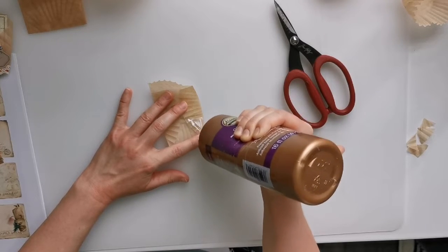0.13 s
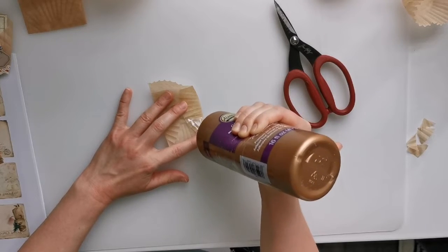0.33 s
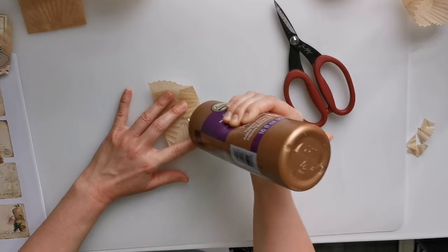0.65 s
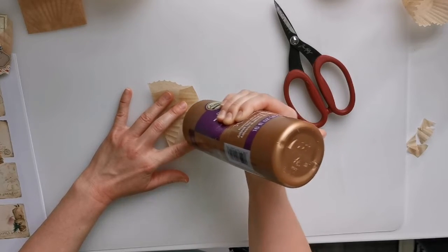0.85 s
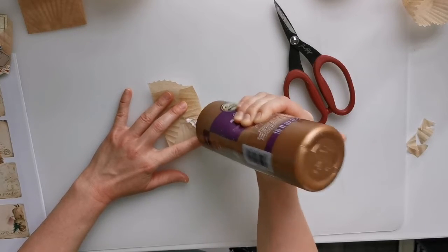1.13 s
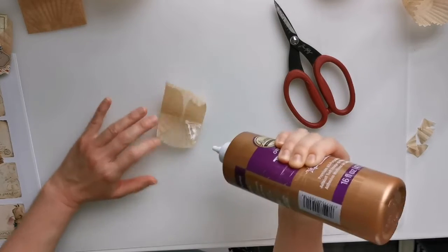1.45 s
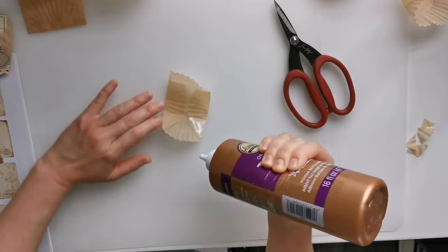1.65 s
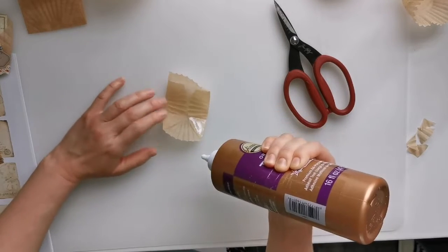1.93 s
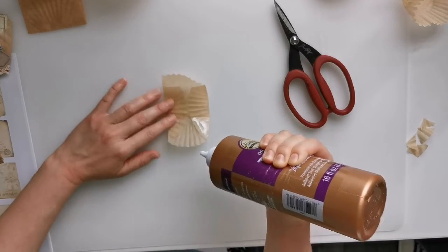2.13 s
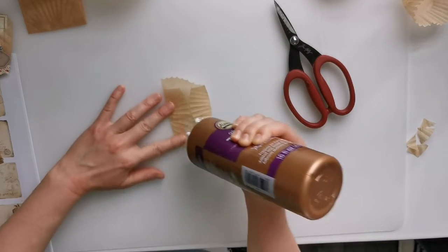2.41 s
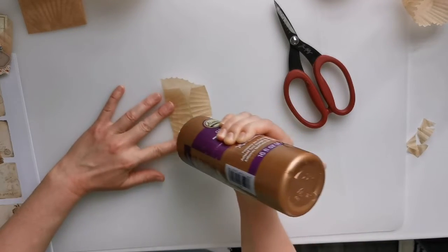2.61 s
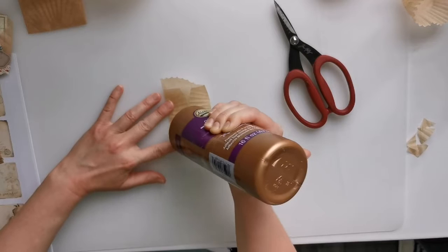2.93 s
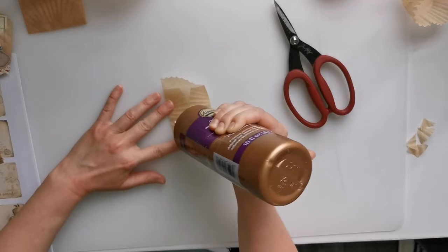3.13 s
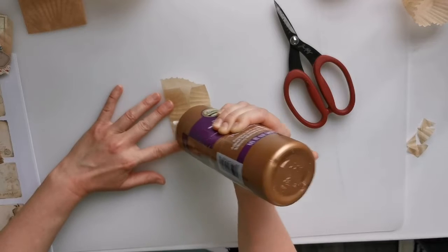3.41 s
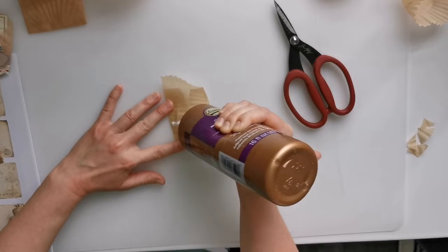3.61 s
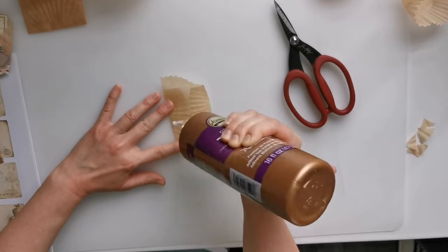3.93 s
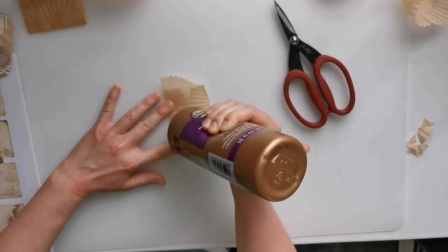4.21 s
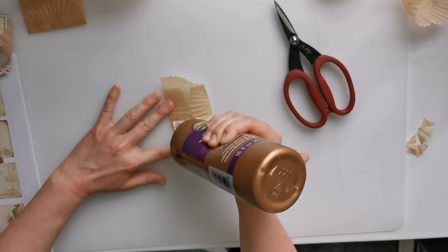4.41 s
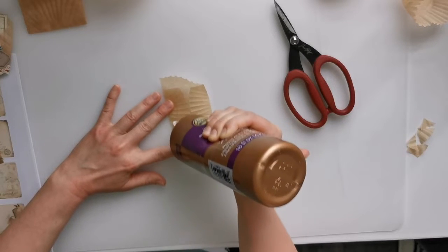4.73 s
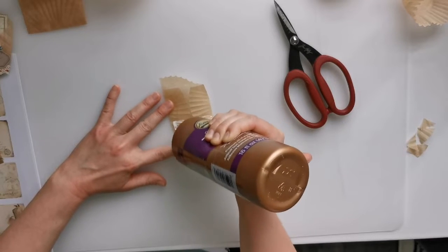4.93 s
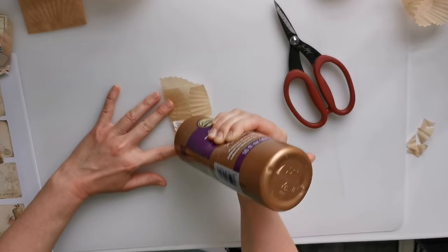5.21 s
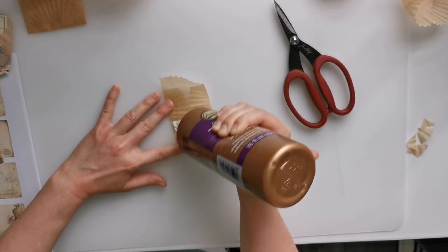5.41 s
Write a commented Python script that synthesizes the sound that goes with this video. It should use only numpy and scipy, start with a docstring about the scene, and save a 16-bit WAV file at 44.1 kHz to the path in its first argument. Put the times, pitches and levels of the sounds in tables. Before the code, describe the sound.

Over a soft fan hum, pleated baking paper ticks, springs loose with sharp snaps, then crinkles under a plastic bottle's tip.

```python
"""A fan hums in a small room while fingers hold pleated parchment paper flat, with faint ticks.
Near 1.4 s the paper springs free with loud snaps and dull scuffs on the table mat; near 2.2 s the
fingers take hold again. From 3 s the nozzle of a plastic glue bottle drags along the pleats: creases
snap in irregular bursts, and strokes rustle and crackle. Last dabs follow from about 4.5 s.
Now and then a hand bumps the table; the table and the room throw each snap back."""
import sys
import numpy as np
from scipy import signal
from scipy.fft import rfft, irfft, next_fast_len
from scipy.io import wavfile
from scipy.ndimage import map_coordinates

SR = 44100
rng = np.random.default_rng(int(sys.argv[2]) if len(sys.argv) > 2 else 0)


def unload_audio(sound):
    """Save the sound as a 16-bit wav file, at the path given as the first command line argument."""
    columns = np.transpose(np.atleast_2d(sound))
    # keep every value between -1 and 1, then stretch to whole-number steps
    steps = np.round(np.clip(columns, -1, 1) * 32767)
    wavfile.write(sys.argv[1], SR, steps.astype(np.int16))


N = 245195

# strokes over the paper; fingers slide smoothly, the nozzle catches on the pleats:
# start_s, length_s, level_db, crackle_over_rub_db
STROKES = [(1.372, 0.03, -43.5, -3), (1.408, .06, -62, -4), (1.461, 0.069, -52.5, -11),
           (1.703, 0.061, -58.5, -2), (1.766, 0.043, -56.5, -4.5), (2.171, 0.093, -50, -6),
           (2.307, .15, -54, -3.5), (2.45, .11, -60.5, -3.5), (2.598, 0.099, -72, -5),
           (3.047, 0.053, -67, 6), (3.2, 0.22, -64.5, 12), (3.55, .14, -58, 11), (3.713, .26, -50, 8),
           (4.0, 0.14, -64, 2), (4.395, 0.29, -72, 3), (5.091, .11, -51.5, -4), (5.329, 0.095, -51.5, 2)]
TRAVEL_S, TRAVEL_AT_HZ = .0004, 9000  # a bending wave's time across the sheet, at this frequency


def snap(ring_ms, pitch_hz, body_db, sparkle_db,
         flutter=0.81, facet_db=7.5, facet_width_hz=750, apart=0.65, size=1024):
    """Buckling: a crease gives way with one kick, the sheet flutters and the freed facet resonates."""
    # spectrum of a typical snap: frequency_hz, level_db
    paper_spectrum = [(100, -28), (400, -20.5), (900, -5.5), (2000, -11.5), (3200, -5), (4700, -1),
                      (9000, -1.5), (13000, -7.5), (16000, -6.5)]
    t, hz = np.arange(size) / SR, np.fft.rfftfreq(size, 1 / SR)
    body = body_db * curve([(300, .2), (1500, 1), (2800, 1), (4500, 0)], hz)
    sparkle = sparkle_db * curve([(8000, 0), (10500, .4), (14000, 1)], hz)
    facet = facet_db / (1 + ((hz - pitch_hz) / facet_width_hz) ** 2)
    response = minimum_phase(curve(paper_spectrum, hz) + body + sparkle + facet)
    # dispersion: bending waves carry the treble across the sheet faster than the bass
    bending = np.exp(-4j * np.pi * TRAVEL_S * np.sqrt(hz * TRAVEL_AT_HZ))
    # the flutter falls fast, then lingers; it radiates a little differently to each side
    decay = np.exp(-t / .005) / (1 + (t / (.0014 * max(ring_ms, .3))) ** 2)
    noise = rng.standard_normal((3, size))
    kick = flutter * (noise[0] + apart * noise[1:]) * decay
    kick[:, 0] += 1
    sound = irfft(rfft(kick) * bending * response)
    return sound * np.sqrt(.003 * SR) / np.linalg.norm(sound, axis=1, keepdims=True)  # equal energy


def creases(level_db=1.0, tick_db=-13, ticks=7):
    """Stress release: fibres let go just before and after each large snap, the weaker the farther off."""
    # creases that snap: time_s, level_db, pitch_hz, ring_ms, body_db, sparkle_db, left_over_right_db
    snaps = [ (0.0165, -47.5, 9200, 0.34, 2, -3, -6), (.148, -53.5, 9100, 0.65, 4, 5.5, 2),
             (0.1816, -60, 9200, .4, -2, 1, 1), (.204, -49.5, 6800, .5, 9, 8, -4),
             (.2143, -43.5, 13000, 0.65, 0.5, 8.5, -2), (.697, -64, 9000, 0.43, 10, -5, -1),
             (.808, -51, 6900, 0.62, 5, 2, 1), (.885, -43, 7000, 0.21, 1.5, -3, -2),
             (.9143, -43, 7000, 0.38, 0, 2, -4), (1.0422, -51, 7000, 0.5, -5, -5, -1),
             (1.113, -50.5, 9200, 0.58, 2, 9, 9), (1.355, -42.5, 12400, 0.75, 2, 5, 0),
             (1.39, -34, 12700, 0.61, 7, 11, -5), (1.4205, -40, 6700, .8, -1, -11, 3),
             (1.423, -29.5, 6800, 1.8, -1, 5.5, -4), (1.4266, -33, 7100, 1.4, 4, 3, 0),
             (1.781, -51, 6700, 0.68, 3, 0, 6), (2.225, -40, 5700, 1, 1.5, 3, 0),
             (2.2628, -39, 6950, 1.7, 11, -4, -1), (2.3211, -41.5, 12000, 3, 7, -1, 0),
             (2.3494, -46.5, 5900, 0.27, 7, -8, 4), (2.3665, -51, 4400, 0.89, 4, 2, 0),
             (3.0661, -45.5, 6100, .6, 2, -1, 2), (3.1376, -47, 5700, .4, -2, -6, 2),
             (3.186, -39, 6800, 2.8, 3, -9, -0.5), (3.2463, -32.5, 6900, 0.21, 5, 1, 2),
             (3.2785, -45.5, 12900, .5, -4, -5, 0), (3.306, -40.5, 6900, 0.57, 6.5, -38, -3),
             (3.323, -41.5, 7000, 1, 5, -24, 1), (3.3598, -43.5, 5200, 1, -3, 0, 0),
             (3.4176, -39, 7100, 3, 2, 3, 0), (3.5366, -33, 8900, 0.14, 6.5, 13, -1),
             (3.581, -38, 7100, .3, -1.5, -4, 0), (3.608, -30, 7300, 0.24, 0, 2.5, 0),
             (3.6244, -42.5, 7000, 0.7, 5, -8, 1), (3.6635, -43, 9000, 2.5, 4, -10, -1),
             (3.673, -37, 7000, 3.6, 2, 2, -4.5), (3.7197, -38, 11000, 2.1, -3.5, -15, -1),
             (3.723, -34, 10700, 1.5, 0, -3, -2.5), (3.7582, -36, 9600, 1.5, 7, 5, -7),
             (3.7746, -37, 5200, 0.66, 6, -16, -0.5), (3.823, -30.5, 4400, 1.8, -2, -9.5, -2),
             (3.8268, -33.5, 7100, 1.7, 13, 3, -4.5), (3.8415, -37, 6400, .6, -9, -11, -2.5),
             (3.8546, -28, 7200, 0.63, -1, 2.5, 2.5), (3.9027, -43, 6900, 0.98, -4, -19, 0),
             (3.9304, -40, 4300, 1.8, -7, -21, 1), (3.9784, -30.5, 11300, 5.1, -1, -6, -5),
             (4.026, -33, 7700, 1.6, -2, -8, -2), (4.0541, -44.5, 10700, 0.58, 6, 9, 1),
             (4.17, -45.5, 6300, 0.39, -3, -3.5, -2.5), (4.569, -55, 5500, .8, 10, -11, -5),
             (4.6249, -62, 11500, 0.33, -11, 2, -5), (4.6777, -33.5, 5350, 1.1, -3, 8, -4.5),
             (4.7157, -42.5, 9000, 2.3, -1, -1, -5), (4.9747, -53, 6500, 0.71, 7, 5.5, -7),
             (5.0897, -52.5, 11400, 1.7, 0, 4, -2), (5.117, -47.5, 6650, 0.49, -4, -17, -1),
             (5.1224, -44, 8600, 1.3, 6, 4, -9), (5.134, -38, 8600, 0.99, 1, -2, -3),
             (5.1518, -36, 5900, 3.1, -4, 8, -2), (5.1548, -37, 11100, 0.88, 2.5, -2.5, -1),
             (5.1794, -45.5, 4900, .3, 5, -7, -4), (5.2473, -28.5, 7150, 0.36, -4.5, 6, -3),
             (5.3236, -43, 6800, .3, 0, -7, -12), (5.3322, -28.5, 11500, 0.25, -5, 1, -1.5),
             (5.3594, -43.5, 6900, 1.7, 3, -6, -2), (5.3994, -36.5, 12800, 0.44, 6, 7.5, -4)]
    out = np.zeros((2, N))
    for time_s, db, pitch_hz, ring_ms, body_db, sparkle_db, pan_db in snaps:
        sound = snap(ring_ms, pitch_hz, body_db, sparkle_db) * amp(db + level_db) * pan(pan_db)
        add(out, time_s - TRAVEL_S, sound)
        for late_ms in rng.uniform(-2.2, 5, ticks):
            add(out, time_s + late_ms / 1000, sound * amp(tick_db - 3 * abs(late_ms - .7)))
    return out


def crackles(spread_db=3, colour_spread_db=4, pan_spread_db=4, per_stroke=4):
    """Small-scale buckling: a stroke trips creases at random, as strongly as it is firm and rough."""
    out = np.zeros((2, N))
    for start_s, length_s, db, over_rub_db in STROKES:
        for when, strength, facet, bright, side in rng.uniform(-1, 1, (per_stroke, 5)):
            sparkle_db = colour_spread_db * bright - 1
            sound = snap(ring_ms=1.0, pitch_hz=6500 * 1.6 ** facet, body_db=-1, sparkle_db=sparkle_db)
            gain = amp(db + over_rub_db + spread_db * strength) * pan(pan_spread_db * side)
            add(out, start_s + length_s * (1 + when) / 2, gain * sound)
    return out


def pressure(rise_share=0.51):
    """Contact force: each stroke presses in and eases off along one arch."""
    t, out = np.arange(N) / SR, np.zeros(N)
    for start_s, length_s, db, _ in STROKES:
        corners_s = [start_s, start_s + rise_share * length_s, start_s + length_s]
        out += amp(db) * np.sin(np.interp(t, corners_s, [0, np.pi / 2, np.pi]))
    return out


def rustle(level_db=-5, grains_per_s=2500, spread_db=2, hiss=0.62, apart=0.96):
    """Stick-slip friction: fibres catch and slip in tiny ticks over a soft rub, rising with pressure."""
    # spectrum of rubbed paper: frequency_hz, level_db
    rustle_spectrum = [(200, -39), (900, -11.5), (2000, -2.5), (4500, -2), (7000, -1), (10000, -6),
                       (13000, -8.5), (16000, -9.5)]
    slips = rng.random(N) < grains_per_s / SR
    ticks = slips * amp(spread_db * np.minimum(rng.exponential(1, N), 4))
    noise = rng.standard_normal((3, N)) * (unit(ticks) + hiss)
    grains = tint(noise[0] + apart * noise[1:], rustle_spectrum)
    return amp(level_db) * pressure() * unit(grains)


def scuffs(width_hz=170, size=8192):
    """Resonant filtering: each short rub on the mat is friction noise heard through one dull resonance."""
    # rubs on the mat: start_s, length_s, level_db, resonance_hz
    rubs = [(1.38, 0.024, -60, 1100), (1.417, 0.02, -49.5, 1870), (1.478, 0.014, -51.5, 1820),
            (1.721, 0.045, -68, 1700), (1.776, 0.038, -59, 1680), (2.184, 0.1, -64, 1610),
            (3.452, 0.012, -47.5, 2250)]
    t, out = np.arange(size) / SR, np.zeros((2, N))
    for start_s, length_s, db, hz in rubs:
        noise = rng.standard_normal((3, size))
        resonance = signal.iirpeak(hz, hz / width_hz, SR)
        rub = signal.lfilter(*resonance, noise[0] + noise[1:])
        age = t / (length_s / 4)  # 1 at the peak
        add(out, start_s, amp(db) * unit(rub) * age * np.exp(1 - age))
    return out


def bumps():
    """Soft impact: a hand's slow push on the table excites mainly low frequencies, alike on both sides."""
    # hand contacts: start_s, length_s, level_db
    contacts = [(0.757, .06, -51), (3.037, 0.09, -47.5), (4.431, 0.075, -51)]
    # spectrum of a bump: frequency_hz, level_db
    bump_spectrum = [(10, -4), (35, -6), (70, -14), (120, -5.5), (200, -23), (500, -29), (2000, -80)]
    t = np.arange(N) / SR
    push = sum(amp(db) * np.sin(np.pi * np.clip((t - start_s) / length_s, 0, 1))
               for start_s, length_s, db in contacts)
    return push * unit(tint(rng.standard_normal(N), bump_spectrum))


def table_reflections(x, rise_s=.0003, decay_s=.0016, size=2048):
    """Early reflection: the table and the things on it add scattered echoes to the direct sound."""
    # first reflections: delay_ms, level_db
    echoes = [(2.7, -13), (7.4, -13.5), (10.4, -14.5), (12.6, -20), (17.5, -25)]
    t, taps = np.arange(size) / SR, np.zeros((2, size))
    for delay_ms, db in echoes:
        scatter = rng.standard_normal((2, size)) * np.exp(-t / decay_s) * (1 - np.exp(-t / rise_s))
        add(taps, delay_ms / 1000, amp(db) * scatter / np.linalg.norm(scatter, axis=1, keepdims=True))
    return x + signal.oaconvolve(x, taps, axes=1)[:, :N]


def room(x, tail_db=-10, build_s=0.00083, bands=20):
    """Reverberation: each band's stored energy returns as a diffuse wash that dies sooner in the treble."""
    # reverberation time: frequency_hz, t60_s
    decay_times = [(300, 0.82), (2000, 0.8), (5000, 0.37), (9000, 0.4), (15000, 0.28)]
    edges_hz, out = np.geomspace(300, 18000, bands + 1), np.zeros((2, N))
    build = np.exp(-1 / (build_s * SR))
    for low, high in zip(edges_hz, edges_hz[1:]):
        band = signal.butter(3, [low, high], "bandpass", fs=SR, output="sos")
        t60_s = curve(decay_times, np.sqrt(low * high))
        retained = amp(-60 / (t60_s * SR)) ** 2  # share of energy left after one sample
        power = np.mean(signal.sosfilt(band, x + 1e-9) ** 2, 0) + 1e-20
        stored = signal.lfilter([(1 - retained) * (1 - build)], np.poly([retained, build]), power)
        wash = unit(signal.sosfilt(band, rng.standard_normal((2, N))))
        out += np.sqrt(abs(stored)) * wash
    return amp(tail_db) * out


def fan(level_db=-1, waver_db=2, wander_rad=0.58):
    """Rotational harmonics: tones near multiples of the fan's turning rate, each wavering a little."""
    # fan tones: frequency_hz, level_db, left_over_right_db
    tones = [(31.6, -58, 1), (61.26, -61.5, 0), (91.9, -62.5, -3.5), (121.4, -72, -13.5), (182.5, -65, 6),
             (222, -80.5, 16), (254.7, -76.5, -8), (274.5, -65, 1.5), (305.2, -65.5, -4)]
    t, out = np.arange(N) / SR, np.zeros((2, N))
    for hz, db, pan_db in tones:
        phase = 2 * np.pi * (hz * t + rng.random()) + wander_rad * drift(rate_hz=3.8)
        gain = amp(db + level_db + waver_db * drift(rate_hz=5))
        out += pan(pan_db) * gain * np.sqrt(2) * np.sin(phase)
    return out


def air(level_db=-54.0, swell_db=2.0, swell_hz=7, rumble_top_hz=160):
    """Broadband noise: fan wash and a randomly swelling rumble, coherent left to right in the bass."""
    # the room's steady noise: frequency_hz, level_db
    air_spectrum = [(8, -9.5), (20, -5.5), (45, -3), (75, -8), (112, 2), (160, -12), (260, -10.5),
                    (345, -16), (430, -11), (750, -15), (1300, -28), (2200, -28), (4500, -41), (11000, -50),
                    (15500, -50.5)]
    # likeness of left and right: frequency_hz, coherence
    air_coherence = [(50, 0.98), (300, 1), (550, 0.58), (1200, 0.053), (6000, 0.068)]
    size = next_fast_len(N)
    hz = np.fft.rfftfreq(size, 1 / SR)
    left, independent = rfft(rng.standard_normal((2, size)))
    coherence = curve(air_coherence, hz)
    right = coherence * left + np.sqrt(1 - coherence ** 2) * independent
    spectrum = np.array([left, right]) * amp(curve(air_spectrum, hz))
    wash = irfft(spectrum, size)[:, :N]
    rumble = irfft(spectrum / (1 + (hz / rumble_top_hz) ** 6), size)[:, :N]
    swell = amp(swell_db * drift(swell_hz))
    return amp(level_db) * unit(wash + (swell - 1) * rumble)


def ports(x, size=2048):
    """Resonance: each microphone port rings at its own frequencies and colours all that enters."""
    # responses of the two ports: frequency_hz, gain_db
    left_port = [(300, .5), (620, -6), (2400, -5), (4000, -1.5), (4800, -1.5), (5700, 0), (7000, -3),
                 (7900, -5), (8900, 3), (10200, 1.5), (12000, -4.5), (15500, -4), (16200, -25)]
    right_port = [(300, -1), (620, -2), (1300, -2), (3000, -0.5), (3600, -4), (4700, 2), (6200, 0),
                  (6900, 4.5), (8000, -1), (10900, 5), (13300, 4.5), (13900, 2), (15600, -3),
                  (16200, -11.5)]
    hz = np.fft.rfftfreq(size, 1 / SR)
    rings = np.array([irfft(minimum_phase(curve(port, hz))) for port in (left_port, right_port)])
    return signal.oaconvolve(x, rings, axes=1)[:, :N]


def amp(db):
    """Decibels to amplitude gain."""
    return 10 ** (np.asarray(db) / 20)


def unit(x):
    """Normalisation to rms 1."""
    return x / np.sqrt(np.mean(x ** 2) + 1e-20)


def curve(points, hz):
    """Interpolation of (frequency_hz, value) points on a log frequency axis."""
    knots_hz, values = np.transpose(points)
    return np.interp(np.log(hz + 1), np.log(knots_hz + 1), values)


def add(mix, start_s, sound):
    """Superposition: a stereo sound joins the mix at start_s."""
    part = mix[:, max(round(start_s * SR), 0):][:, :sound.shape[-1]]
    part += sound[:, :part.shape[-1]]


def pan(balance_db):
    """Constant-power panning: a column of left and right gains for a level difference."""
    pair = amp(np.array([[balance_db], [-balance_db]]) / 2)
    return pair / np.sqrt(np.mean(pair ** 2))


def minimum_phase(gain_db):
    """Causality: the spectrum of a filter with this gain that rings after the blow, never before."""
    cepstrum = irfft(np.log(amp(gain_db)))
    half = len(cepstrum) // 2
    cepstrum[1:half] *= 2
    cepstrum[half + 1:] = 0
    return np.exp(rfft(cepstrum))


def tint(x, points):
    """Spectral shaping of a whole track by (frequency_hz, gain_db) points."""
    size = next_fast_len(N)
    gain = amp(curve(points, np.fft.rfftfreq(size, 1 / SR)))
    return irfft(rfft(x, size) * gain, size)[..., :N]


def drift(rate_hz):
    """Slow random modulation of rms near 1."""
    knots = rng.standard_normal(1024)
    return map_coordinates(knots, [np.arange(N) * rate_hz / SR], order=1, mode="wrap") * np.sqrt(3 / 2)


def scene():
    """Superposition: the paper, its reflections, the bumps and the fan add up at the ports."""
    paper = creases() + crackles() + rustle() + scuffs()
    return ports(table_reflections(paper) + room(paper) + bumps() + air() + fan())


def record(dry, edge_hz=16300):
    """Band limiting: a steep low-pass removes the highest treble."""
    low_pass = signal.firwin(301, edge_hz, window=("kaiser", 9), fs=SR)
    return signal.oaconvolve(dry, low_pass[None], "same")


dry = scene()
out = record(dry)
unload_audio(out)
```